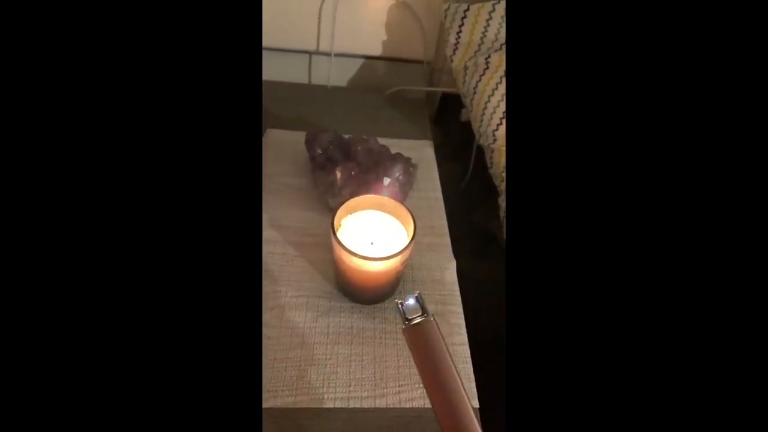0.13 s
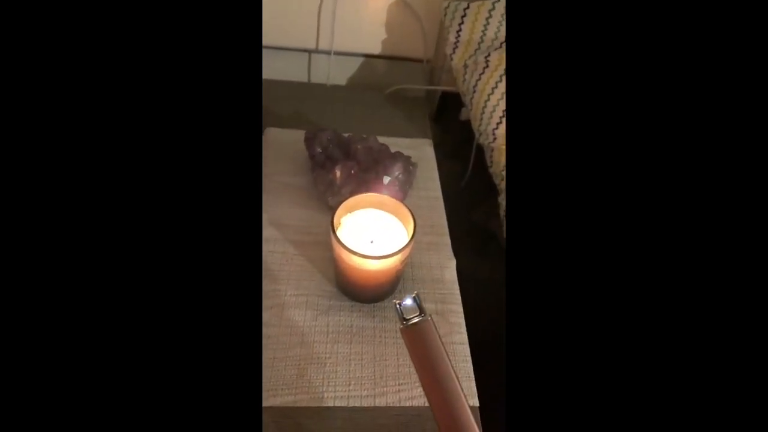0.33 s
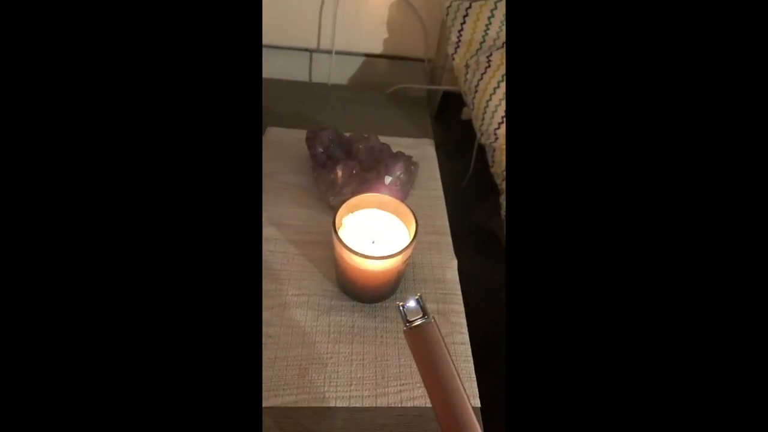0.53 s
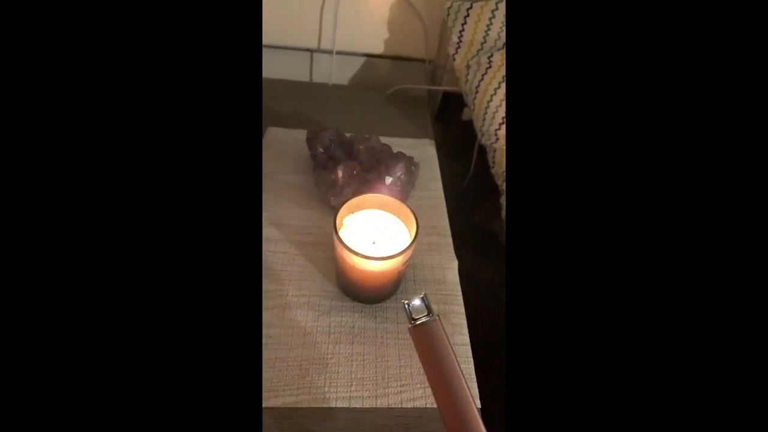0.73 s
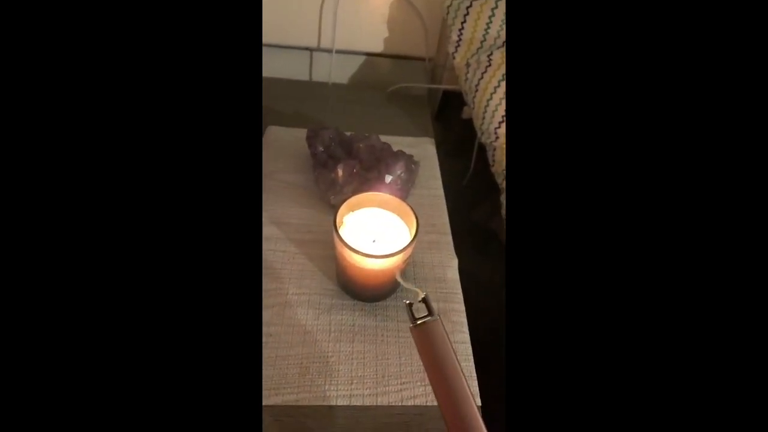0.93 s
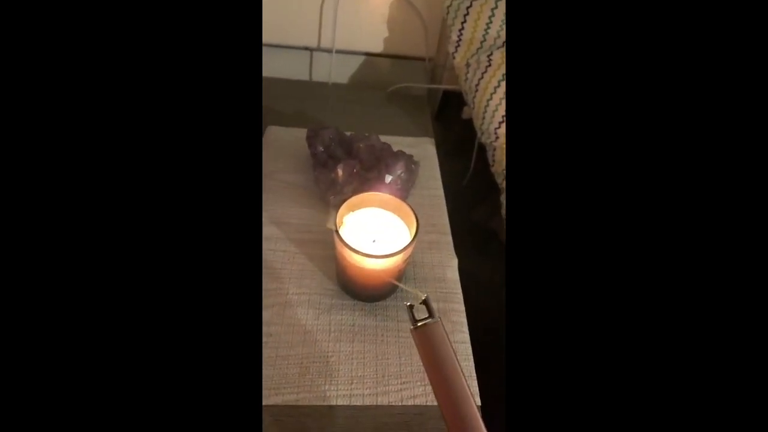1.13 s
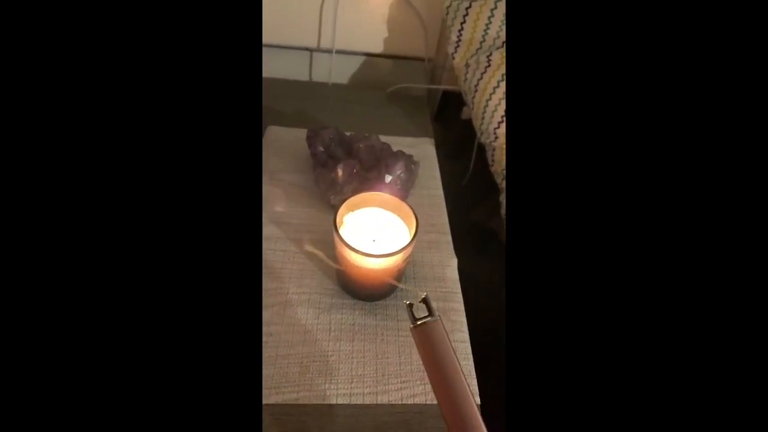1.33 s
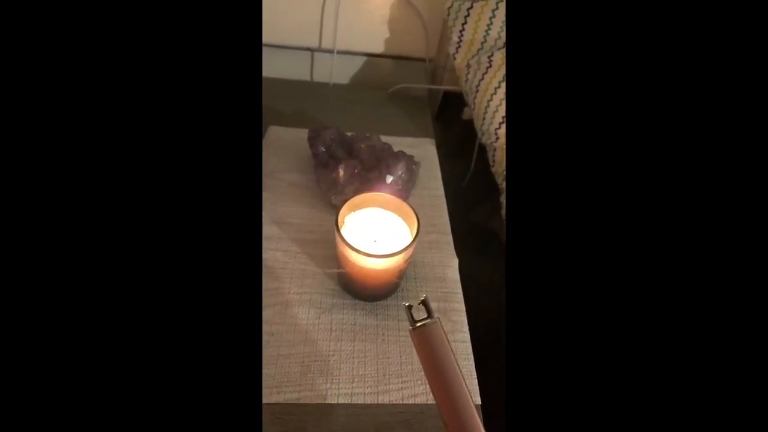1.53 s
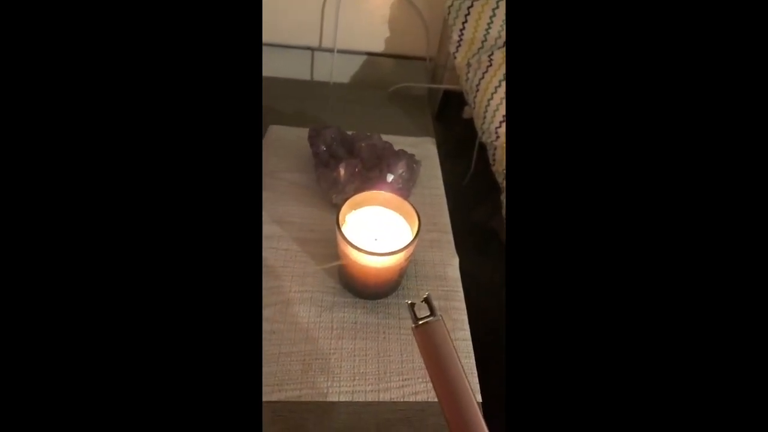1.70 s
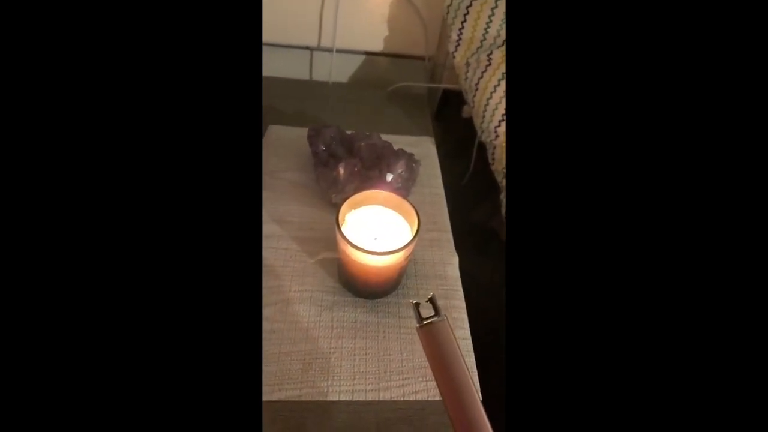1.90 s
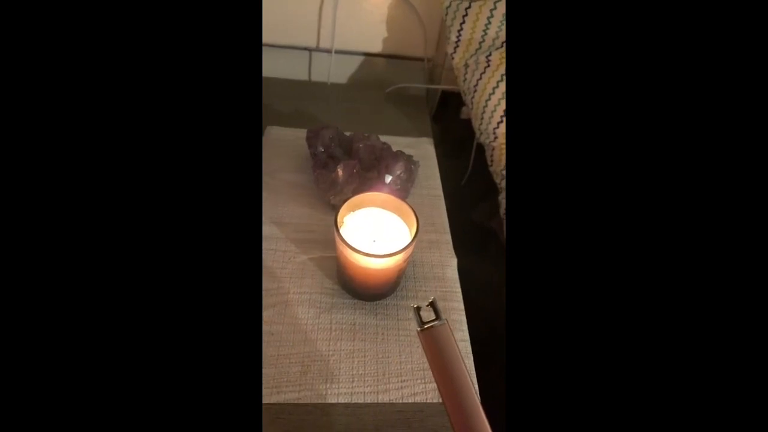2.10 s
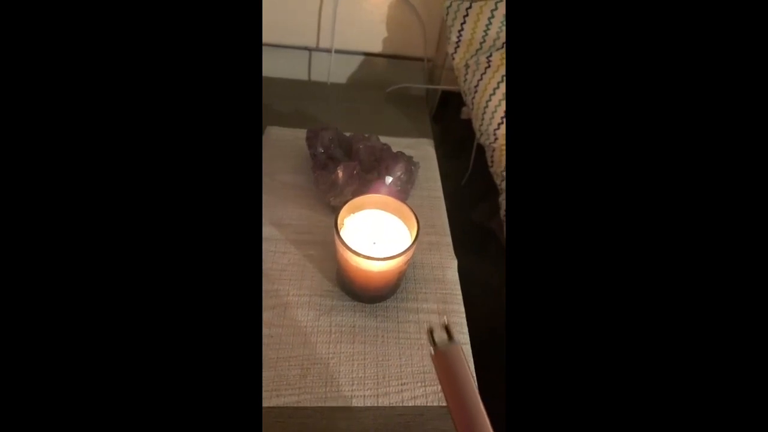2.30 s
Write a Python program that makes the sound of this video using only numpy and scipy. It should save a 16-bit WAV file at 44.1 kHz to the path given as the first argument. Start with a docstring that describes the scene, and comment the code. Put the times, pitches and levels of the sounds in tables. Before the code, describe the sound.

An electric arc lighter clicks on, sputters and sizzles briefly, then its button snaps back off

```python
"""Handheld arc lighter

The button of a lighter held close to a phone clicks down, a first spark strikes, and the arc sputters, then sizzles
until the button snaps back. The arc is a random train of discharges over hiss, shaped by one spectrum;
the clicks are noisy blows that ring damped body modes. A table and a small room reflect both over
a low rumble, a faint hum and hiss, whose lower part rises a little near the end."""
import sys
import numpy as np
from scipy import signal
from scipy.fft import rfft, irfft, next_fast_len
from scipy.io import wavfile
from scipy.ndimage import uniform_filter1d, minimum_filter1d, map_coordinates

SR = 44100
rng = np.random.default_rng(int(sys.argv[2]) if len(sys.argv) > 2 else 0)


def file_out(sig):
    """Save sig as 16-bit WAV at sys.argv[1]."""
    # one column per channel
    cols = np.atleast_2d(sig).T
    # limit, then scale
    lim = np.clip(cols, -1, 1)
    pcm = np.round(lim * 32767).astype(np.int16)
    wavfile.write(sys.argv[1], SR, pcm)


def how_loud(loudness_db):
    """Turn decibels into a plain amplitude multiplier (0 dB gives 1, 20 dB gives 10)."""
    steps = np.asarray(loudness_db, float) / 20
    return 10 ** steps


N = 103635  # length in samples

# Strength of the arc drive over time: start_s, level_db (rms)
ARC_LEVEL = [(0.165, -54.5), (0.185, -58), (0.2, -51.5), (0.21, -59.5), (0.23, -49.5), (0.248, -50),
             (0.262, -44), (0.317, -44), (0.333, -39.5), (0.379, -48.5), (0.399, -46), (0.411, -45.5),
             (0.432, -46.5), (0.459, -45), (0.467, -45), (0.49, -39), (0.5, -45.5), (0.515, -36),
             (0.526, -45), (0.533, -37), (0.57, -39.5), (0.58, -42), (0.607, -41.5), (0.631, -36.5),
             (0.655, -42), (0.666, -47.5), (0.673, -36.5), (0.719, -43), (0.893, -42.5)]
# Strong bursts where the arc jumps: start_s, level_db (root of the summed squares), length_s (Gaussian decay)
ARC_BURSTS = [(.1589, -16, .0007), (.1600, -21, .0015), (.1719, -32, .0003), (.1767, -33, .0003),
              (.1907, -27, .0005), (.1948, -31, .0003), (.1976, -28, .0003), (.2146, -18, .0008),
              (.2223, -30, .0003), (.2339, -32, .0004), (.2680, -20, .0007), (.2925, -23, .0005),
              (.3293, -18, .001), (.3314, -21, .0004), (.3341, -21, .0003), (.3384, -17, .001),
              (.3471, -23, .0003), (.3507, -19, .0006), (.3697, -23, .0006), (.3884, -19, .0006),
              (.3984, -17, .0011), (.4014, -21, .0004), (.4173, -19, .0009), (.4212, -18, .0005),
              (.4337, -22, .0008), (.4404, -19, .0003), (.4658, -23, .0004), (.4675, -20, .0005),
              (.4859, -20, .0003), (.4905, -20, .0004), (.4939, -20, .0004), (.5203, -20, .0005),
              (.5301, -15, .0007), (.5728, -19, .0003), (.5870, -19, .0004), (.5899, -20, .0004),
              (.5924, -21, .0004), (.6571, -22, .0004), (.6736, -21, .0005), (.6765, -19, .0004),
              (.7567, -22, .0004), (.7840, -22, .0004), (.7886, -21, .0004), (.8052, -22, .0004)]
# Spectrum of one discharge at the microphone: frequency_hz, relative_density_db (per Hz)
SPARK_SPECTRUM = [(150, -16), (400, -19.5), (900, -26.5), (1500, -18.5), (2300, -16), (3000, -12.5),
                  (4200, -9.5), (7000, -7), (8500, -2.5), (10000, -2), (13000, 0), (17000, -15.5)]
# Spectrum of the low flutter of the lit arc: frequency_hz, relative_density_db (per Hz)
GLOW_SPECTRUM = [(60, -11.5), (150, -1), (500, -8), (1200, -11), (3000, -31), (16000, -57)]
# Button snaps, press then release: start_s, blow_level_db, snap_length_s
BUTTON_CLICKS = [(0.1458, -17, 0.0001), (0.8992, -15, 0.0018)]
# Modes of the plastic body: frequency_hz, press_level_db, release_level_db, t60_s
BODY_MODES = [(1130, -28.5, -8.5, 0.012), (1505, -13, -6, 0.0089), (2420, -19.5, -3.5, 0.0083),
              (3000, -4.5, -2.5, .003), (3614, -0.5, -4, 0.0041), (4850, -1.5, -2.5, .003),
              (5650, -1.5, -16, 0.0046), (7100, -3, -15.5, 0.0028), (8750, -9, -2, 0.0021),
              (10050, -6.5, -5, .003), (11700, -8.5, -11, .0025), (13500, -5, -10.5, 0.0029),
              (15700, -20.5, -16, .006)]
# Spectrum of a click summed over all directions: frequency_hz, relative_density_db (per Hz)
CLICK_TO_WALLS = [(400, -24), (1000, -3), (2500, -4), (5000, -3), (6500, -9.5), (10000, -10),
                  (16000, -20.5)]
# Reflections from nearby surfaces: delay_s, gain (ratio)
NEAR_ECHOES = [(.0002, 0.098), (.00124, 0.068), (.0018, -0.12), (.0025, 0.12)]
# Spectrum of room rumble and microphone hiss: frequency_hz, relative_density_db (per Hz)
NOISE_SPECTRUM = [(14, -47.5), (24, -16.5), (38, -8.5), (73, 0), (129, -11.5), (172, -22.5), (244, -23),
                  (271, -30), (345, -30.5), (831, -41.5), (1110, -44.5), (12300, -55.5), (14000, -56.5)]

STRIKE_S, ARC_OFF_S = 0.15828, 0.899


def curve(points, x, scale=lambda v: v):
    """Linear interpolation: (x, y) points joined by straight lines on the given scale."""
    p = np.array(points, float)
    return np.interp(scale(x), scale(p[:, 0]), p[:, 1])


def level(x, db):
    """Normalisation: the signal is scaled to the given rms level."""
    return x * how_loud(db) / np.sqrt(np.mean(x ** 2))


def colour(x, spectrum):
    """Minimum-phase filtering: a one-sided cepstrum gives a causal filter of the given spectrum."""
    size = next_fast_len(2 * len(x)) // 2 * 2
    hz = np.arange(size // 2 + 1) * SR / size + 1
    cepstrum = irfft(np.log(how_loud(curve(spectrum, hz, np.log))), size)
    cepstrum[1:size // 2] *= 2
    cepstrum[size // 2 + 1:] = 0
    response = np.exp(rfft(cepstrum))
    return irfft(rfft(x, size) * response, size)[:len(x)]


def walk(rate_hz):
    """Slow random modulation: levels held for 1 / rate, then slewed, with unit spread."""
    hold = max(int(SR / rate_hz), 2)
    steps = np.repeat(rng.standard_normal(N // hold + 1), hold)
    slewed = uniform_filter1d(steps, hold)[:N]
    return slewed / slewed.std()


def top_cut(x, hz):
    """Zero-phase filtering: a steep low-pass run both ways adds no delay."""
    return signal.sosfiltfilt(signal.ellip(8, 0.1, 40, hz, fs=SR, output="sos"), x)


def discharges():
    """Random point process: discharges of either sign and uneven strength, clumped, over a finer hiss."""
    sparks_per_s, spread_db = 3900, 4.0
    hiss_db = -5  # against the sparks
    clump_db, clumps_per_s = 1.5, 170
    strength = how_loud(spread_db * rng.exponential(size=N).clip(0, 3))
    sparks = (rng.random(N) < sparks_per_s / SR) * strength
    sparks = level(sparks * np.sign(rng.standard_normal(N)), 0)
    sparks = sparks + how_loud(hiss_db) * rng.standard_normal(N)
    return level(sparks * how_loud(clump_db * walk(clumps_per_s)), 0)


def burst(length_s):
    """Sparse impulsive noise: a first impulse and random ones under a Gaussian decay, at unit energy."""
    t = np.arange(512) / SR
    crackle = rng.standard_normal(512) * (rng.random(512) < 0.35)
    crackle *= np.exp(-(t / max(length_s, 1e-4)) ** 2)
    crackle[0] = 0.63
    return crackle / np.sqrt(np.sum(crackle ** 2))


def arc():
    """Source and filter: discharges, bursts and the first strike all share one spark spectrum."""
    strike_db, strike_thin = -10.5, 0.75  # the opposite second sample takes bass from the sharp crack
    tip_echo_s, tip_echo_gain = 0.0007, 0.25
    t = np.arange(N) / SR
    lit = (t > ARC_LEVEL[0][0]) * (t < ARC_OFF_S)
    drive = discharges() * how_loud(curve(ARC_LEVEL, t)) * lit
    for start_s, db, length_s in ARC_BURSTS:
        drive[int(start_s * SR):][:512] += how_loud(db) * burst(length_s)
    drive[int(STRIKE_S * SR):][:2] += how_loud(strike_db) * np.array([1, -strike_thin])
    # the surface just under the tip mirrors every spark
    mirrored = map_coordinates(drive, [(t - tip_echo_s) * SR], order=3)
    drive = drive + tip_echo_gain * mirrored
    impulse = np.zeros(2048)
    impulse[0] = 1
    spark_size = np.sqrt(np.sum(colour(impulse, SPARK_SPECTRUM) ** 2))
    return colour(drive, SPARK_SPECTRUM) / spark_size


def glow():
    """Amplitude-modulated noise: a soft low flutter that lasts as long as the arc is lit."""
    glow_db = -66.5  # rms before the flutter and gate
    flutter_db, flutter_hz = 2.0, 22
    t = np.arange(N) / SR
    lit = uniform_filter1d(1. * (t > STRIKE_S) * (t < ARC_OFF_S), 600)
    noise = level(colour(rng.standard_normal(N), GLOW_SPECTRUM), glow_db)
    return noise * how_loud(flutter_db * walk(flutter_hz)) * lit


def snap(length_s):
    """Impulsive excitation: one blow, a few quick contacts and a short chatter, at unit energy."""
    chatter_s, chatter_db = 0.0056, -22
    t = np.arange(4096) / SR
    contacts = rng.standard_normal(len(t)) * (rng.random(len(t)) < 0.3)
    quick = 0.16 * np.exp(-(t / length_s) ** 2)
    push = contacts * (quick + how_loud(chatter_db) * np.exp(-t / chatter_s))
    push[0] = 1
    return push / np.sqrt(np.sum(push ** 2))


def body_ring(column):
    """Modal superposition: decaying sines of alternating sign, with levels from the given column."""
    t = np.arange(4096) / SR
    ring = np.zeros(len(t))
    for k, mode in enumerate(BODY_MODES):
        decay = how_loud(-60 * t / mode[3])
        ring += (-1) ** k * how_loud(mode[column]) * np.sin(2 * np.pi * mode[0] * t) * decay
    return ring


def button():
    """Directional radiation: modal clicks heard direct, and smoother ones that reach the walls."""
    to_walls_db = -1.5  # energy against the direct click
    body_low_hz = 810  # the small body has no bass
    direct, to_walls = np.zeros(N), np.zeros(N)
    impulse = np.zeros(4096)
    impulse[0] = 1
    broad = colour(impulse, CLICK_TO_WALLS)
    for j, (start_s, db, snap_s) in enumerate(BUTTON_CLICKS):
        click = how_loud(db) * signal.fftconvolve(snap(snap_s), body_ring(1 + j))[:4096]
        match = np.sqrt(np.sum(click ** 2) / np.sum(broad ** 2))
        place = slice(int(start_s * SR), int(start_s * SR) + 4096)
        direct[place] += click
        to_walls[place] += how_loud(to_walls_db) * match * broad
    high_pass = signal.butter(3, body_low_hz, "high", fs=SR, output="sos")
    return signal.sosfilt(high_pass, direct), to_walls


def room(direct, to_walls):
    """Reflection and reverberation: close echoes, early reflections, then a dull wash that builds, holds and dies."""
    wash_db, treble_hz = -22.5, 6000
    early_db, early_s = 7.5, 0.0045  # against the late wash, before scaling
    rise_s, hold_until_s, t60_s = 0.021, 0.049, 0.09
    t = np.arange(12000) / SR
    hz = np.arange(2049) * SR / 4096
    near = irfft(1 + sum(g * np.exp(-2j * np.pi * hz * d) for d, g in NEAR_ECHOES))[:512]
    late = np.minimum(t / rise_s, 1) * how_loud(-60 * np.maximum(t - hold_until_s, 0) / t60_s)
    early = how_loud(early_db) * np.exp(-(t / early_s) ** 2)
    dull = signal.lfilter(*signal.butter(1, treble_hz, fs=SR), rng.standard_normal(len(t)))
    wash = dull * (late + early) * (t > 0.002)
    wash *= how_loud(wash_db) / np.sqrt(np.sum(wash ** 2))
    return signal.fftconvolve(direct, near)[:N] + signal.fftconvolve(to_walls, wash)[:N]


def hum():
    """Frequency and amplitude modulation: a faint tone wavers in pitch and level."""
    hum_hz, hum_db = 240.7, -80.5  # mean pitch, rms
    pitch_hz = hum_hz * (1 + 0.0082 * walk(6.8))
    tone = np.sin(2 * np.pi * np.cumsum(pitch_hz) / SR)
    return level(tone * how_loud(2.5 * walk(7.9)), hum_db)


def background():
    """Filtered noise: a swelling rumble and a hiss, whose part below 2900 Hz rises near the end, with the hum."""
    noise_db, noise_top_hz = -57, 15300  # rms before the top cut
    rumble_top_hz, swell_db, swell_hz = 390, 2.5, 9
    rise_db, rise_centre_s, rise_time_s = 6, 2.25, 0.1
    noise = colour(rng.standard_normal(N + 8192), NOISE_SPECTRUM)[8192:]  # the filter has settled
    noise = top_cut(level(noise, noise_db), noise_top_hz)
    rumble = signal.filtfilt(*signal.butter(1, rumble_top_hz, fs=SR), noise)
    hiss = noise - rumble
    t = np.arange(N) / SR
    rise = how_loud(rise_db / (1 + np.exp((rise_centre_s - t) / rise_time_s)))
    hiss = hiss + top_cut(hiss, 2900) * (rise - 1)
    return hiss + rumble * how_loud(swell_db * walk(swell_hz)) + hum()


def scene():
    """Superposition: the lighter in its room, the flutter of the arc and the background add."""
    click, click_to_walls = button()
    sizzle = arc()
    lighter = room(click + sizzle, click_to_walls + sizzle)
    return (lighter + glow() + background())[None]


def low_pass(x):
    """Removes everything above the highest recorded frequency."""
    return signal.sosfilt(signal.butter(12, 16800, fs=SR, output="sos"), x)


def record(dry):
    """Band limiting: the microphone loses the deepest bass, and the phone narrows its band in busy treble."""
    low_hz, top_hz = 43, 16400
    busy_top_hz, busy_db, busy_s = 13200, -62, 0.05
    high_pass = signal.butter(3, low_hz, "high", fs=SR, output="sos")
    x = signal.sosfilt(high_pass, top_cut(dry, top_hz))
    treble_power = uniform_filter1d((x - top_cut(x, 5000)) ** 2, 256)
    # treble counts as busy once it stays strong through busy_s, a window ending 400 samples ahead
    window = int(busy_s * SR)
    held = minimum_filter1d(treble_power, window, origin=window // 2 - 400)
    busy = uniform_filter1d((held > how_loud(busy_db) ** 2) * 1., 512)
    mix = busy * top_cut(x, busy_top_hz) + (1 - busy) * x
    return low_pass(mix)


dry = scene()
out = record(dry)
file_out(out)
```